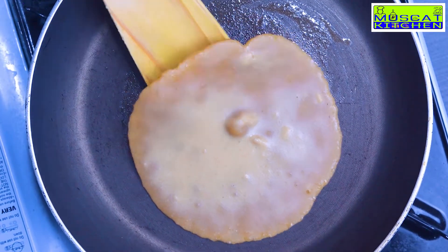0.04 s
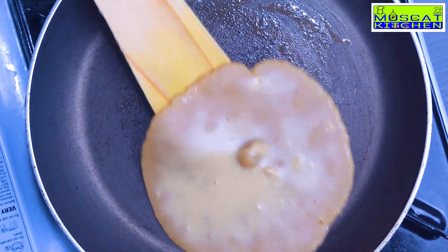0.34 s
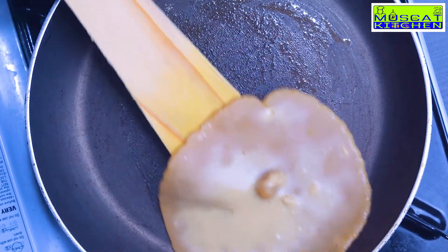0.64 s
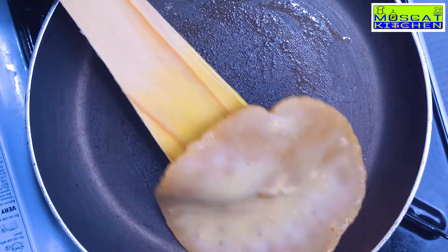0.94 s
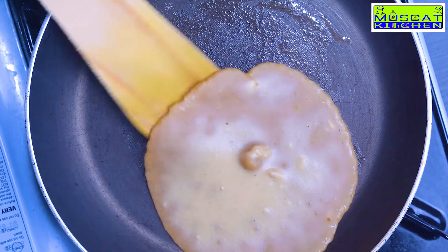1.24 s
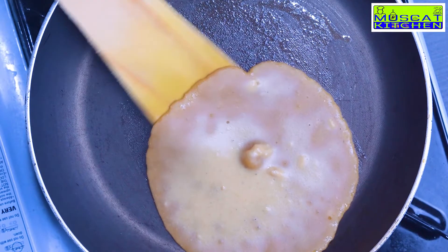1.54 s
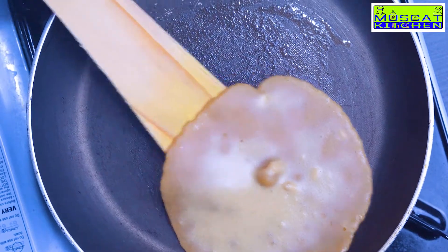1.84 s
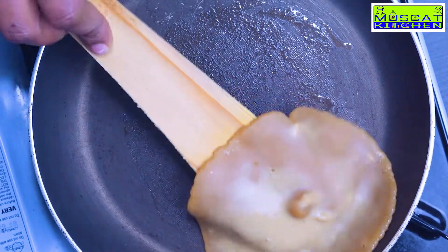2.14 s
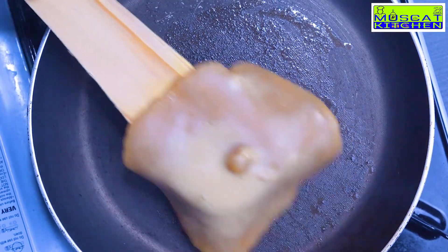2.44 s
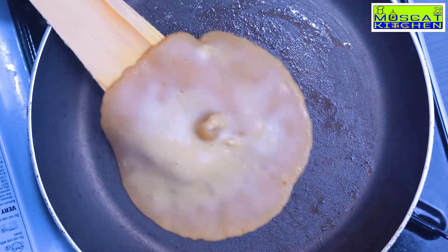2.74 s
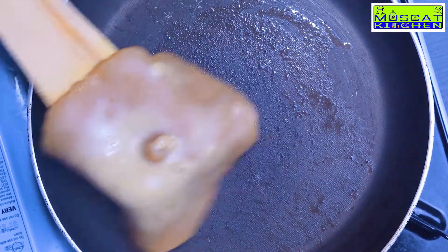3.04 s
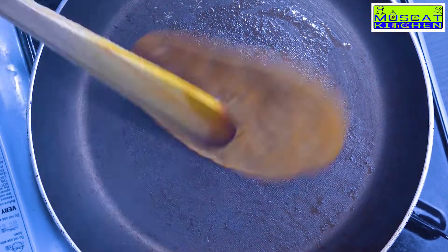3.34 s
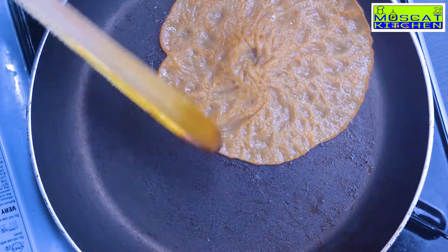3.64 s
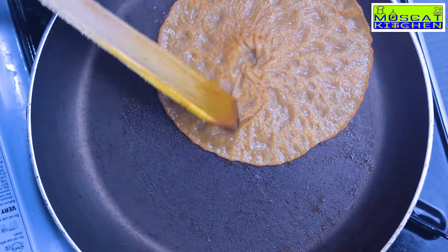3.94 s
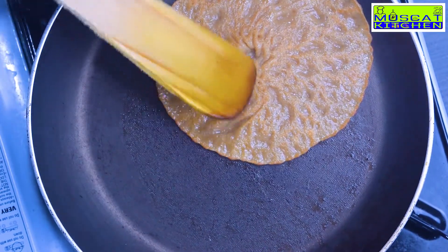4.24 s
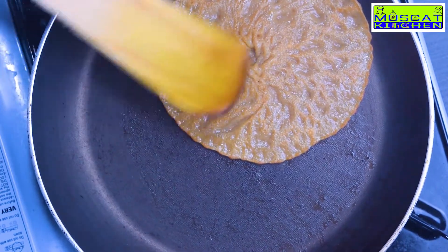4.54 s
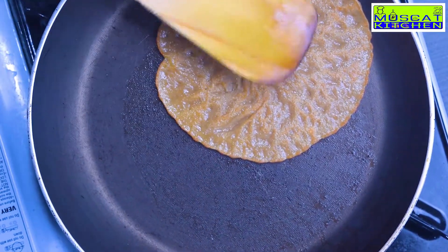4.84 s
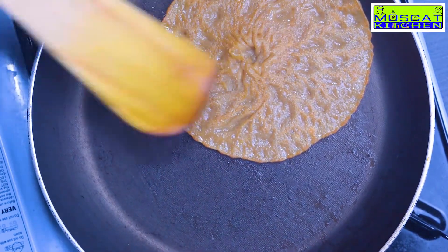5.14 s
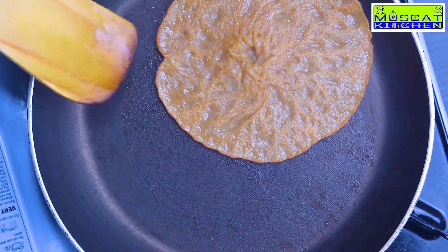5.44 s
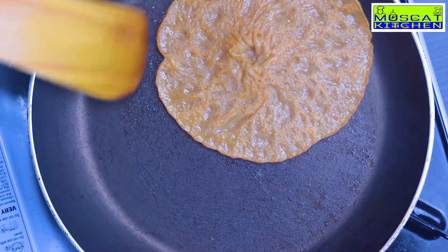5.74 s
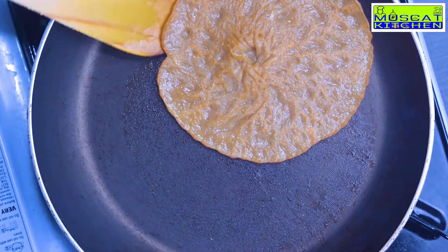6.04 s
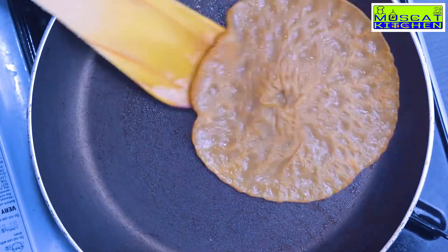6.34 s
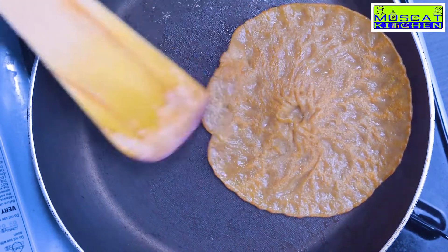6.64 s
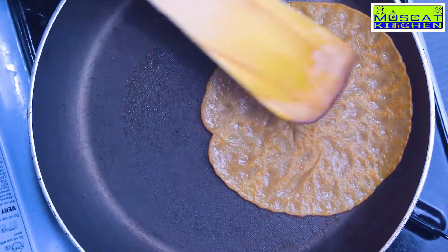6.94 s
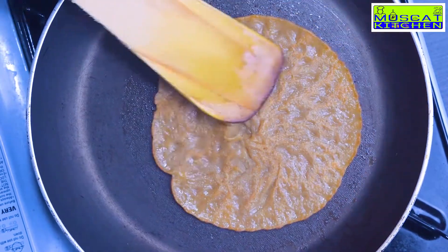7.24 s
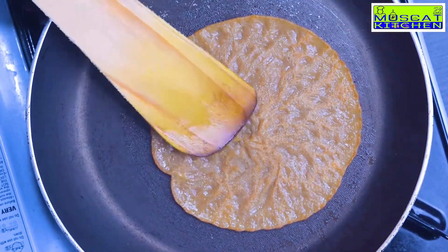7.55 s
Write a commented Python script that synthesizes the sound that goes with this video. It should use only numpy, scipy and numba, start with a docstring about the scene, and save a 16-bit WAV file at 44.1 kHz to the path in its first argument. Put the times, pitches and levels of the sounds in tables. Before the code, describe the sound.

A small pancake sizzles in a frying pan as a wooden spatula scrapes, knocks and flips it, setting off a bubbling hiss.

```python
"""A small pancake fries in a non-stick pan, close up, in a home kitchen.
Thousands of tiny bubbles burst into a fizz, and drops of water spit in the oil. A wooden spatula knocks
and scrapes the pan and squeezes out steam as it slides under the pancake, lifts it and flips it.
The wet side slaps down, hisses, comes to the boil and dies down as a crust sets.
The small room reflects it all, over still air and a faint mains hum."""
import sys
import numpy as np
from scipy import signal
from scipy.fft import rfft, irfft
from scipy.io import wavfile
from scipy.ndimage import uniform_filter1d, map_coordinates
from numba import njit

SR = 44100
rng = np.random.default_rng(int(sys.argv[2]) if len(sys.argv) > 2 else 0)


def output_pcm(signal):
    """Save a mono or channel-first signal as 16-bit PCM at the path in sys.argv[1].

    Samples are clipped to [-1, 1] before scaling.
    """
    pcm = np.clip(np.atleast_2d(signal).T, -1, 1) * 32767
    wavfile.write(sys.argv[1], SR, np.round(pcm).astype(np.int16))


N = 335160
TIME = np.arange(N) / SR
BINS = np.fft.rfftfreq(4096, 1 / SR)
LIFT_S, FLIP_S = 2.71, 3.43  # the pancake leaves the pan; its wet side lands


def amp(db):
    """Decibels to gain."""
    return 10 ** (np.asarray(db) / 20)


def unit(x):
    """Scales to rms 1."""
    return x / np.sqrt(np.mean(x ** 2) + 1e-20)


def curve(points, hz=BINS):
    """Interpolates breakpoints on a log-frequency axis."""
    point_hz, value = np.transpose(points)
    return np.interp(np.log(hz + 1), np.log(point_hz + 1), value)


def add(mix, start_s, sound):
    """Mixes a sound in at a time."""
    part = mix[..., max(round(start_s * SR), 0):][..., :sound.shape[-1]]
    part += sound[..., :part.shape[-1]]


def colour(x, gain_db):
    """Causal EQ with the given gain on BINS."""
    log_gain = np.log(amp(np.r_[gain_db, gain_db[-2:0:-1]]))
    taps = np.fft.ifft(np.exp(np.conj(signal.hilbert(log_gain)))).real[:len(BINS)]
    return signal.oaconvolve(x, taps)[:len(x)]


def stereo(mid, side):
    """Mid and side to left and right: the microphone's two ports differ most in the treble."""
    # stereo width: freq_hz, side_gain_db
    width = [(100, -11.5), (600, -16.5), (1200, -24.5), (2500, -11), (5000, -10), (9000, -6.5), (13000, -1)]
    side = colour(side, curve(width))
    return np.array([mid + side, mid - side])


def pan_resonance_db():
    """The EQ that the hollow of the pan puts on the frying."""
    # resonances of the pan: centre_hz, width_hz, gain_db
    resonances = [(550.4, 15, 10.5), (1137, 115, 7), (1250, 66, 3.5), (1557, 140, 3), (1673, 48, 3),
                  (2246, 25, 3), (2575, 66, 6.5), (2727, 1170, -5), (3055, 100, 5.5), (3623, 110, 4),
                  (8350, 670, 1.5), (9450, 590, 1.5), (10550, 230, 2.5)]
    return sum(db / (1 + (2 * (BINS - hz) / width) ** 2) for hz, width, db in resonances)


def pops(scatter_db, scatter_s, count, size=512):
    """Bursting bubbles as mid and side: a click, then reflections off the pan's floor and wall."""
    taps = rng.standard_normal((count, 2, size)) * np.exp(-np.arange(size) / SR / scatter_s)
    taps *= amp(scatter_db) / np.linalg.norm(taps, axis=2, keepdims=True)
    taps[:, 0, 0] = 1
    taps[:, 1, 0] = 2 * rng.random(count) - 1  # place across the pan
    return taps


@njit
def scatter_grains(starts, sizes, kinds, bank, length):
    """Adds one grain from the bank at each start."""
    out = np.zeros((2, length + bank.shape[2]))
    for i in range(len(starts)):
        for channel in range(2):
            for k in range(bank.shape[2]):
                out[channel, starts[i] + k] += sizes[i] * bank[kinds[i], channel, k]
    return out[:, :length]


def crackle(spectrum, per_s, spread_db, largest, clump_db, clump_hz,
            ping, scatter_db, scatter_s, coupling, count=300):
    """Bubbles of many sizes burst in flurries; coupling is how strongly they excite the pan."""
    flurry_rolloff = 1 + (np.fft.rfftfreq(N, 1 / SR) / clump_hz) ** 2
    flurry = unit(irfft(rfft(rng.standard_normal(N)) / flurry_rolloff, N))
    starts = np.flatnonzero(rng.random(N) < per_s / SR)
    signs = rng.choice([-1, 1], N)[starts]
    bulk = np.minimum(rng.exponential(1, N)[starts], largest)
    kinds = rng.integers(0, count, N)[starts]
    sizes = signs * amp(spread_db * bulk + clump_db * flurry[starts])
    bank = pops(scatter_db, scatter_s, count)
    step = np.geomspace(1000, 13000, count)[:, None] / SR  # each bubble's own brief pitch
    cycles = step * np.arange(bank.shape[2])
    bank[:, 0] += ping * np.sqrt(step) * np.exp(-cycles / 2) * np.sin(2 * np.pi * cycles)
    bursts = scatter_grains(starts, sizes, kinds, bank, N)
    tone_db = curve(spectrum) + coupling * pan_resonance_db()
    return unit(stereo(*(colour(row, tone_db) for row in bursts)))


def heat(land_s=0.0083, boil_after_s=0.69):
    """Fizz and bubbling gains: steady, sinking at the lift; the wet side lands, boils and crusts over."""
    oil_db, oil_dries_db_per_s = -47, 13
    underside_db, lift_db_per_s, lift_depth_db = -46, 32, 9
    wet_db, wet_dries_db_per_s = -43.5, 1
    boil_db, heat_db_per_s, crust_db_per_s = -35.5, 14, 4.5
    lifted_s, cooked_s = np.maximum(TIME - LIFT_S, 0), np.maximum(TIME - FLIP_S, 0)
    past_boil_s = cooked_s - boil_after_s
    oil = amp(oil_db - oil_dries_db_per_s * lifted_s)
    underside = amp(underside_db - np.minimum(lift_db_per_s * lifted_s, lift_depth_db))
    wet = amp(wet_db - wet_dries_db_per_s * cooked_s)
    boil = amp(boil_db - np.maximum(-heat_db_per_s * past_boil_s, crust_db_per_s * past_boil_s))
    landed = np.minimum(cooked_s / land_s, 1)
    return (1 - landed) * oil + landed * wet, (1 - landed) * underside + landed * boil


def shoves(skew=0.54, roundness=0.88):
    """Hiss and sputter gains: each shove or slap of the pancake meets hot oil and squeezes out steam."""
    # pushes on the pancake, at relative levels: start_s, length_s, hiss_db, sputter_db
    pushes = [(-.06, 0.39, -41, -44), (0.32, 0.31, -41, -44.5), (0.49, 0.44, -44, -39.5),
              (0.663, 0.16, -34, -36), (0.78, 0.23, -34, -43), (0.89, 0.21, -38, -52),
              (1.183, 0.1, -45, -45), (1.41, 0.32, -48.5, -47.5), (1.638, .13, -43, -46),
              (1.815, 0.26, -40, -43.5), (2.009, 0.39, -39.5, -39), (2.212, 0.098, -38.5, -52),
              (2.311, 0.26, -35.5, -50), (2.698, 0.19, -44, -48.5), (2.928, 0.19, -47.5, -54),
              (3.399, 0.065, -47, -50), (3.46, 0.31, -46.5, -63), (6.269, 0.17, -43.5, -45),
              (6.393, 0.082, -42, -40), (6.44, 0.36, -45.5, -47.5), (6.807, 0.049, -45, -37),
              (7.018, 0.36, -47, -42), (7.154, 0.18, -38.5, -38.5), (7.538, 0.24, -46, -46.5)]
    hiss_power, sputter_power = np.zeros((2, N))
    for start_s, length_s, hiss_db, sputter_db in pushes:
        progress = np.clip((TIME - start_s) / length_s, 0, 1)
        pressure = np.maximum(np.sin(np.pi * progress ** skew), 0) ** roundness  # fast rise, slower fall
        hiss_power += (pressure * amp(hiss_db)) ** 2
        sputter_power += (pressure * amp(sputter_db)) ** 2
    return np.sqrt(hiss_power), np.sqrt(sputter_power)


def under_spatula(sizzle, delay_s=0.000707, sway=0.29, glide_s=0.12, echo_gain=0.43):
    """The sizzle bounces off the sliding spatula; the gap keeps changing, so its resonances shift."""
    wander = rng.standard_normal(N)
    for _ in range(2):
        wander = uniform_filter1d(wander, int(glide_s * SR), mode="wrap")
    echo_at = (TIME - delay_s * np.exp(sway * unit(wander))) * SR
    echo = np.array([map_coordinates(row, [echo_at], order=3) for row in sizzle])
    return unit(sizzle + echo_gain * echo)


def sizzling(fizz_gain, hiss_gain, fizz_db=2.5, fresh_oil_db=1.0, steam_db=2.5, snaps_db=-5.5):
    """Open oil crackles and snaps; wet batter gives a fine steam hiss that takes over at the flip."""
    # tone of fizzing oil: freq_hz, gain_db
    fizz_eq = [(100, -51), (400, -37), (800, -0.5), (1600, -7.5), (3000, -2.5), (5000, 1.5), (7000, -0.5),
               (9500, 1), (11000, -3.5), (13000, -9), (16000, -23.5)]
    # dry snap of a tiny droplet: freq_hz, gain_db
    snap_eq = [(100, -57), (1000, -11), (3000, 0), (6500, -9), (8100, 8), (8800, 3), (9800, 8.5),
               (12000, -9), (16000, -17)]
    # steam leaving the batter: freq_hz, gain_db
    steam_eq = [(100, -51), (400, -27), (800, -4), (1600, -2.5), (3000, -7.5), (5200, -0.5), (7000, 1.5),
                (9500, -0.5), (11000, -3), (13000, -8.5), (16000, -15)]
    # oil left alone is duller than freshly stirred oil: freq_hz, gain_db
    calm_eq = [(4500, 2), (8000, -4), (12000, -4)]
    fizz = crackle(fizz_eq, per_s=3200, spread_db=4.5, largest=3.4, clump_db=5, clump_hz=59.4,
                   ping=0.28, scatter_db=8, scatter_s=0.001, coupling=0.25)
    snaps = crackle(snap_eq, per_s=230, spread_db=3, largest=3.2, clump_db=-1.5, clump_hz=30.2,
                    ping=0.84, scatter_db=-1, scatter_s=0.00061, coupling=0.93)
    steam = crackle(steam_eq, per_s=8000, spread_db=5.5, largest=4.44, clump_db=3, clump_hz=60.4,
                    ping=0.22, scatter_db=-4, scatter_s=0.0045, coupling=1.44)
    oil = unit(fizz + amp(snaps_db) * snaps)
    calm = np.array([colour(row, curve(calm_eq)) for row in oil])
    stirred = under_spatula(np.roll(oil, N // 2, axis=1))  # other bubbles of the same oil
    open_oil = amp(fizz_db) * fizz_gain * calm + amp(fresh_oil_db) * hiss_gain * stirred
    batter = np.hypot(amp(fizz_db) * fizz_gain, amp(steam_db) * hiss_gain) * steam
    wetness = np.where(TIME < FLIP_S, 0.12, 0.72)
    return np.sqrt(1 - wetness) * open_oil + np.sqrt(wetness) * batter


def bubbling(boil_gain, sputter_gain, boil_db=-2.0, blisters_db=-5, trapped_steam_db=0.5):
    """The underside boils, larger blisters pop singly, and squeezed steam sputters and bubbles out."""
    # dull boil beneath the pancake: freq_hz, gain_db
    boil_eq = [(100, -27), (400, -49), (600, -4.5), (900, -7), (1200, -6), (1600, 1.5), (2200, 8.5),
               (3500, 1.5), (5000, -5.5), (8000, -10), (16000, -28)]
    # steam squeezed out: freq_hz, gain_db
    sputter_eq = [(100, -51), (500, -43), (1100, -16), (1650, -0.5), (2100, 9), (2800, -7), (5000, -7),
                  (16000, -12)]
    boil = crackle(boil_eq, per_s=9000, spread_db=3, largest=3.4, clump_db=1.5, clump_hz=66.6,
                   ping=1.88, scatter_db=10, scatter_s=0.0044, coupling=1.27)
    sputter = crackle(sputter_eq, per_s=1100, spread_db=7, largest=3.3, clump_db=1, clump_hz=200,
                      ping=0.57, scatter_db=-16, scatter_s=0.0045, coupling=1.0)
    blisters = crackle(boil_eq, per_s=130, spread_db=3, largest=2.2, clump_db=0, clump_hz=20,
                       ping=1.5, scatter_db=6, scatter_s=0.004, coupling=1.7)
    underside = unit(boil + amp(blisters_db) * blisters)
    underside_gain = amp(boil_db) * np.hypot(boil_gain, amp(trapped_steam_db) * sputter_gain)
    return underside_gain * underside + sputter_gain * sputter


def room_tone(air_db=-59.5, hum_db=-67.5, hum_hz=50):
    """Still room air and mains hum."""
    # tone of the air: freq_hz, gain_db
    air_eq = [(20, 4), (50, -1), (85, 1), (140, -2.5), (300, 3), (600, 5), (1200, 8.5), (4000, -33),
              (16000, -52)]
    air = stereo(*(colour(row, curve(air_eq)) for row in rng.standard_normal((2, N))))
    hum = np.sin(2 * np.pi * hum_hz * TIME)
    return amp(air_db) * unit(air) + amp(hum_db) * unit(hum)


def small_spits(fizz_gain, oil_per_s=10, wet_per_s=5.5, above_fizz_db=20, count=150):
    """Cues for random spits, as strong as the oil is lively and fewer from wet batter."""
    chance = rng.random(count)
    size, body = rng.standard_normal((2, count))
    at = rng.integers(0, N, count)
    per_s = np.where(TIME[at] < FLIP_S, oil_per_s, wet_per_s)
    peak_db = 20 * np.log10(fizz_gain[at]) + above_fizz_db + 2.2 * np.clip(size, -2, 1)
    body_db = -3 + 5 * np.clip(body, -2, 2)
    cues = np.column_stack([TIME[at], peak_db, body_db])
    return cues[chance < per_s * N / SR / count]


def spits(fizz_gain, trim_db=-1.6, crack_db=-6, lead_s=0.0009, ring_hz=9000, ring_width_hz=1500):
    """A drop of water cracks open in the oil, then bursts a moment later with its own bright ring."""
    # the loudest spits: start_s, relative_peak_db, body_db (lift of the lows and mids)
    loud_spits = [(0.023, -13.5, -25), (0.06, -9.5, 11), (0.086, -12, -17), (0.147, -8.5, -22),
                  (0.161, -8, 12.5), (0.205, -16.5, -24), (0.284, -19.5, 7.5), (0.31, -16, -8),
                  (0.368, -7.5, -45), (0.4, -11, -7), (0.443, -15.5, -1), (0.519, -13.5, -18),
                  (0.533, -12.5, 4), (0.547, -11.5, 2), (0.585, -11.5, -0.5), (0.715, -16, 3),
                  (0.852, -10.5, -16), (0.927, -14.5, 7), (0.995, -10.5, 1.5), (1.012, -5.5, -8),
                  (1.07, -12.5, -0.5), (1.083, -15, -7), (1.358, -19, -7), (1.37, -21, 0),
                  (1.387, -20, -12), (1.452, -19.5, 5), (1.515, -12.5, -20), (1.557, -20, -5),
                  (1.657, -21, 4), (1.686, -11, -7), (1.691, -11, -5), (1.768, -23, 0), (1.808, -7, -2),
                  (1.917, -16, 1), (2.094, -8, -2), (2.113, -8, -31), (2.125, -14.5, -12),
                  (2.138, -4, -3.5), (2.162, -7, -12), (2.259, -12, 13), (2.29, -14.5, 4),
                  (2.364, -11.5, 6.5), (2.514, -14, -7), (2.538, -20, -17), (2.567, -18.5, -11),
                  (2.799, -15.5, -1), (2.862, -18, -7), (2.922, -5, -4.5), (2.984, -16, 4.5),
                  (3.036, -14, -8), (3.088, -24, -16), (3.249, -22.5, -4), (3.266, -11.5, 0.5),
                  (3.402, -12.5, -10), (3.551, -12, -4), (3.576, -14.5, 9.5), (3.597, -19, -1),
                  (3.667, -16.5, 2.5), (3.722, -16.5, 1), (3.791, -17, -4), (3.8, -17.5, 2),
                  (3.932, -18, 8), (5.099, -14, -4), (5.233, -17.5, -2), (5.294, -17.5, -15),
                  (5.359, -23, -1), (5.44, -18.5, -16), (5.494, -16, 1), (5.808, -19, 9), (5.957, -21.5, 6),
                  (6.41, -13.5, -34), (6.593, -13.5, -5), (6.71, -22.5, 11), (7.591, -14, -10)]
    # tone of a spit: freq_hz, gain_db
    spit_eq = [(100, -36), (400, -14.5), (900, -4.5), (1700, 10.5), (3000, 7), (6000, 5), (10000, 2.5),
               (12500, -2), (16000, -9.5)]
    out = np.zeros((2, N))
    body_shelf = curve([(300, 1), (2200, 1), (6000, 0)])
    tone_db = curve(spit_eq) + pan_resonance_db()
    for start_s, peak_db, body_db in [*loud_spits, *small_spits(fizz_gain)]:
        froth_s = 0.0027 * amp(0.4 * body_db)  # full-bodied spits splutter longer
        crack, burst = pops(scatter_db=2, scatter_s=froth_s, count=2, size=2048)
        clicks = amp(crack_db) * crack + np.roll(burst, int(lead_s * SR), axis=1)
        pitch_hz = ring_hz * (1 + 0.095 * rng.standard_normal())
        ring_db = 8 / (1 + (2 * (BINS - pitch_hz) / ring_width_hz) ** 2)
        spit = stereo(*(colour(row, tone_db + body_db * body_shelf + ring_db) for row in clicks))
        add(out, start_s, amp(trim_db + peak_db) * spit / abs(spit).max())
    return out


def knocks(thud_db=7, thud_s=0.0097, trim_db=-26, radiate_hz=510, sway=0.032, sway_s=0.015):
    """A blow thuds and rings the pan; the sliding spatula loads its modes, so their pitch wanders."""
    # wood and batter striking the pan: start_s, relative_db, centre_hz, spread_octaves, ring_factor
    blows = [(0.097, -15.5, 1000, 1.02, 0.35), (0.177, -28, 720, 0.47, 0.8), (1.303, -20, 820, 0.66, 0.5),
             (1.361, -29, 740, 0.5, 0.7), (1.504, -28.5, 740, 0.45, 0.86), (1.588, -30, 660, 1.0, 1.3),
             (2.646, -22.5, 1570, 1.8, 1), (2.665, -22.5, 1050, 1.2, 0.22),
             (2.675, -22.5, 1100, 1.45, 0.13), (2.725, -33, 1150, 1.0, 0.4), (3.412, -34, 590, 1.1, 2.1),
             (5.628, -32.5, 890, 0.63, 0.26), (6.765, -35.5, 620, 0.6, 0.55)]
    # modes of the pan: pitch_hz, relative_db, t60_s
    modes = [(377, 7, 0.25), (573, -13, 0.36), (578, 8.5, 0.025), (653, -3, 0.39), (679, 0.5, 0.22),
             (762, -2.5, 0.26), (832, 4, 0.092), (990, -15, 0.043), (1174, 6, 0.01), (1290, -10, 0.021),
             (1440, -6, 0.035), (1650, 22.5, 0.011), (1820, -3, 0.056), (1950, -26, 0.056), (2580, 4, 0.21),
             (3070, -19, .03)]
    out, t = np.zeros(N), np.arange(SR // 2) / SR
    mode_hz, mode_db, t60_s = np.transpose(modes)[:, :, None]
    radiation_db = -10 * np.log10(1 + (radiate_hz / (BINS + 50)) ** 8)
    for start_s, level_db, centre_hz, octaves, ring_factor in blows:
        # where the blow lands sets each mode's sign and strength
        strike = rng.choice([-1, 1], mode_hz.shape) * amp(rng.standard_normal(mode_hz.shape))
        wander = unit(uniform_filter1d(rng.standard_normal((len(modes), len(t))), int(sway_s * SR)))
        cycles = np.cumsum(mode_hz * (1 + sway * wander), axis=1) / SR
        decay = amp(mode_db - 60 * t / (t60_s * ring_factor))
        ring = (strike * decay * np.sin(2 * np.pi * cycles)).sum(0)
        thud = amp(thud_db) * rng.standard_normal(len(t)) * np.exp(-t / thud_s)
        contact_db = -20 * np.log10(1 + (np.log2((BINS + 1) / centre_hz) / octaves) ** 4)
        knock = colour(ring + thud, np.maximum(contact_db + radiation_db, -80))
        add(out, start_s, amp(level_db + trim_db) * unit(knock))
    return out


def spatula_contacts():
    """Brief narrow-band sounds of spatula on pan: scrapes, soft bumps and the ring or thump of knocks."""
    # contacts with the pan: start_s, length_s, level_db, pitch_hz, width_hz
    contacts = [(0.262, 0.023, -47, 610, 70), (0.329, 0.1, -55, 620, 160), (0.686, 0.064, -43, 1920, 700),
                (0.821, 0.063, -37, 1790, 550), (1.302, 0.027, -37, 587, 90), (1.588, 0.039, -44, 569, 50),
                (1.766, 0.15, -52.5, 607, 190), (1.972, 0.084, -53.5, 572, 130),
                (2.383, 0.13, -59.5, 307, 236), (2.642, 0.015, -23, 1217, 302),
                (2.653, 0.032, -34, 930, 407), (2.66, 0.035, -37, 566, 130), (3.4, 0.067, -43.5, 624, 213),
                (5.621, 0.042, -42, 552, 70), (5.625, 0.063, -51, 917, 200), (5.734, 0.089, -45, 1156, 179),
                (6.298, 0.07, -52.5, 750, 400), (7.153, 0.18, -53, 595, 170), (7.157, 0.1, -49, 2130, 700)]
    out = np.zeros(N)
    for start_s, length_s, level_db, pitch_hz, width_hz in contacts:
        band_db = -30 * np.log10(1 + (2 * (BINS - pitch_hz) / width_hz) ** 2)
        band = colour(rng.standard_normal(SR), np.maximum(band_db, -100))[-int(length_s * SR):]
        add(out, start_s, amp(level_db) * unit(band * signal.windows.tukey(len(band), 0.9)))
    return out


def splats(rise=0.11, fall=0.3, octaves=0.61):
    """Wet batter hits hot oil: a dense burst of tiny bubbles that swells and dies within a blink."""
    # the wet side lands, one edge and then the rest: start_s, half_length_s, level_db, centre_hz
    slaps = [(3.4485, 0.03, -31.5, 1500), (3.4507, 0.011, -24, 5200), (3.465, 0.022, -27, 5200)]
    out = np.zeros((2, N))
    for start_s, half_length_s, level_db, centre_hz in slaps:
        progress = np.arange(int(2 * half_length_s * SR)) / SR / half_length_s
        band_db = -10 * np.log10(1 + (np.log2((BINS + 1) / centre_hz) / octaves) ** 4)
        noise = rng.standard_normal((2, len(progress)))
        froth = unit(stereo(*(colour(row, band_db) for row in noise)))
        envelope = np.minimum(progress / rise, 1) * np.exp(-np.maximum(progress - fall, 0) / fall)
        add(out, start_s, amp(level_db) * froth * envelope)
    return out


def kitchen_reverb(send, predelay_s=0.006):
    """Diffuse reflections of a small hard room, each band dying at its own speed."""
    # decay of the room: freq_hz, t60_s
    decay_times = [(200, 0.2), (700, 0.54), (2000, 0.29), (6000, 0.27), (15000, 0.21)]
    noise = rng.standard_normal((2, SR // 2)) * (np.arange(SR // 2) > predelay_s * SR)
    hz, t, bands = signal.stft(noise, SR, nperseg=256)
    decay = amp(-60 * t / curve(decay_times, hz)[:, None])
    tail = stereo(*signal.istft(bands * decay, SR)[1])
    return signal.fftconvolve(send.mean(0)[None], tail / np.linalg.norm(tail[0]), axes=1)[:, :N]


def scene():
    """The pan, the spatula and the room around them."""
    fizz_gain, boil_gain = heat()
    hiss_gain, sputter_gain = shoves()
    ambience = room_tone()
    spatula = np.tile(knocks() + spatula_contacts(), (2, 1))
    frying = sizzling(fizz_gain, hiss_gain) + bubbling(boil_gain, sputter_gain) + splats()
    frying += spits(np.hypot(fizz_gain, amp(-31) * hiss_gain))
    reflections = kitchen_reverb(amp(-10) * frying + amp(-7.5) * spatula)
    return frying + spatula + reflections + ambience


def record(dry, dc_offset=-0.0029, cutoff_hz=16050):
    """The microphone's two ports differ slightly in treble; a small DC offset and a low-pass follow."""
    # balance of the ports: freq_hz, left_over_right_db
    balance = [(1500, 0), (2700, -.5), (6000, 0.5), (9500, -2), (13000, -0.5)]
    lean_db = curve(balance) / 2
    ports = np.array([colour(dry[0], lean_db), colour(dry[1], -lean_db)]) + dc_offset
    lowpass = signal.firwin(511, cutoff_hz, window=("kaiser", 9), fs=SR)
    return signal.oaconvolve(ports, lowpass[None], "same")


dry = scene()
out = record(dry)
output_pcm(out)
```